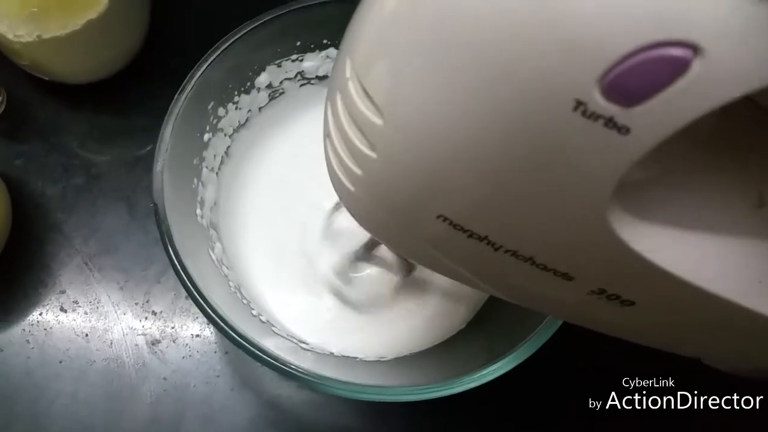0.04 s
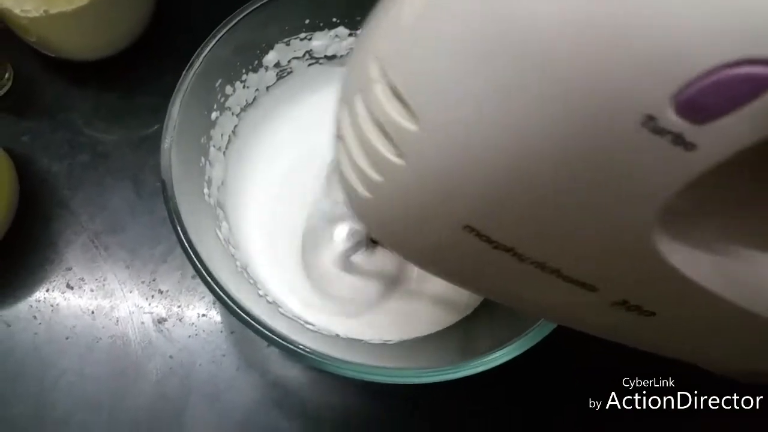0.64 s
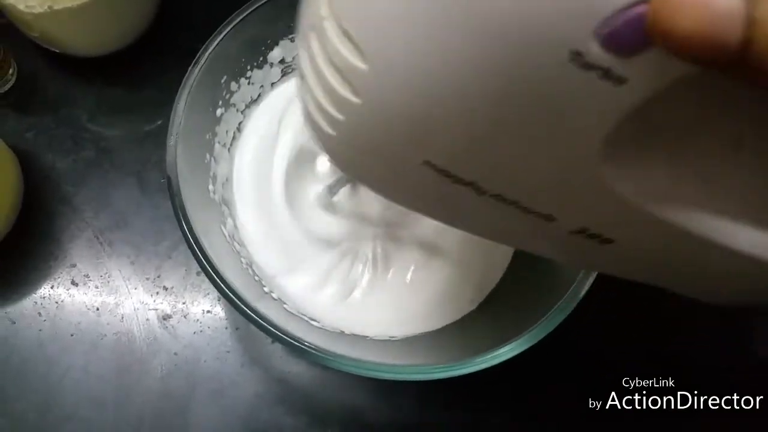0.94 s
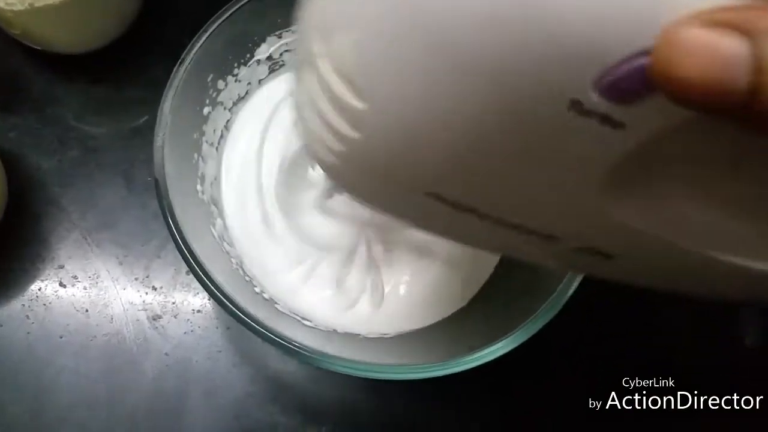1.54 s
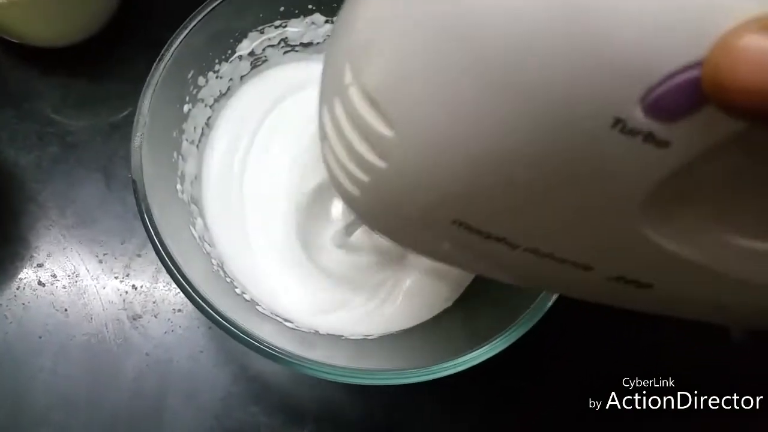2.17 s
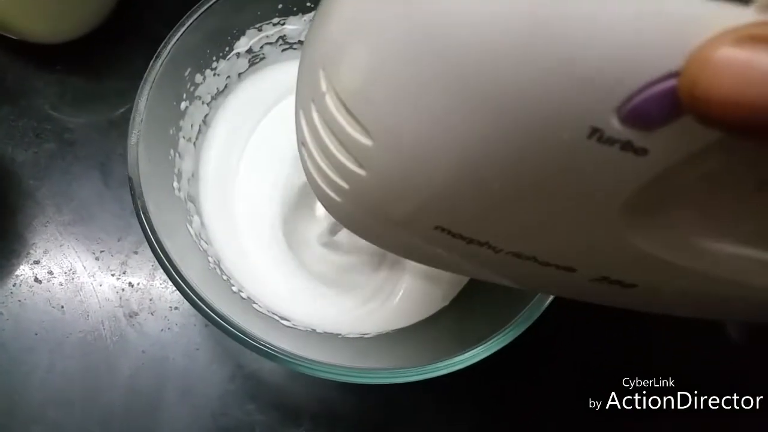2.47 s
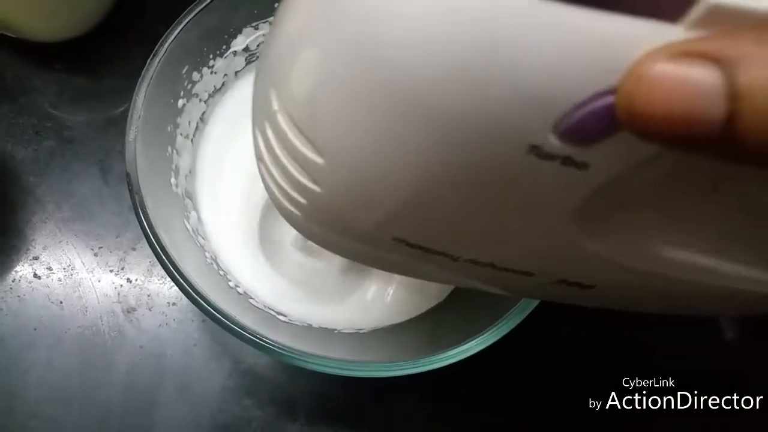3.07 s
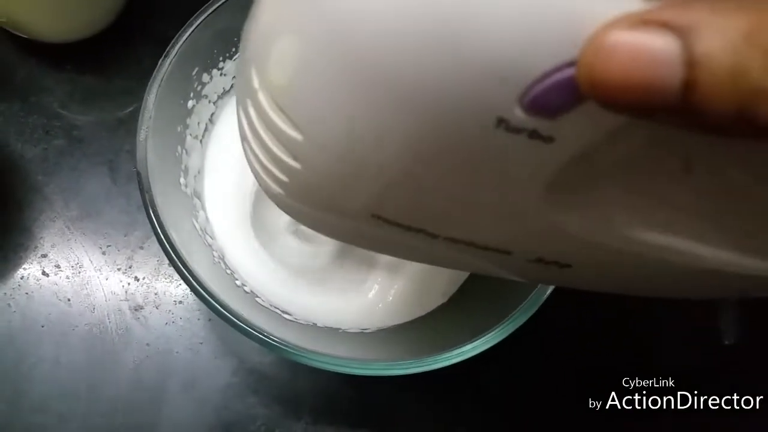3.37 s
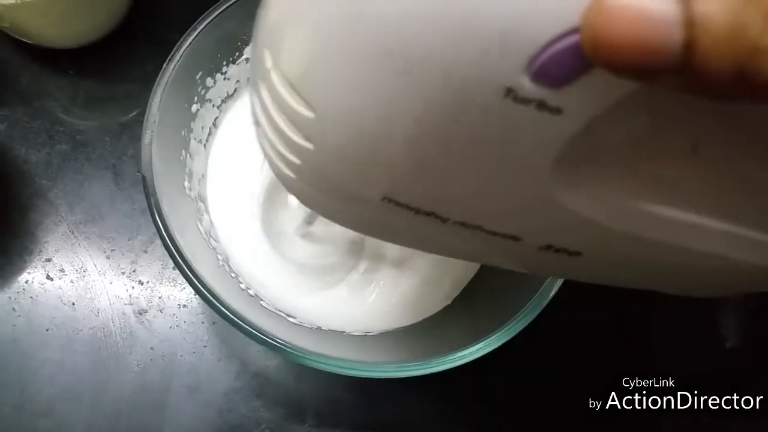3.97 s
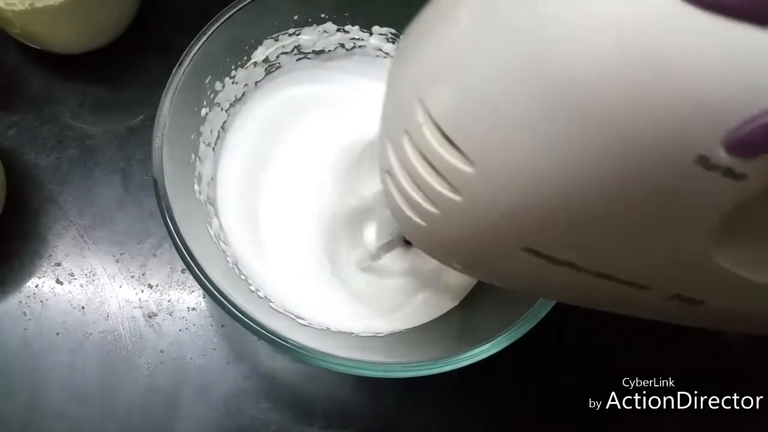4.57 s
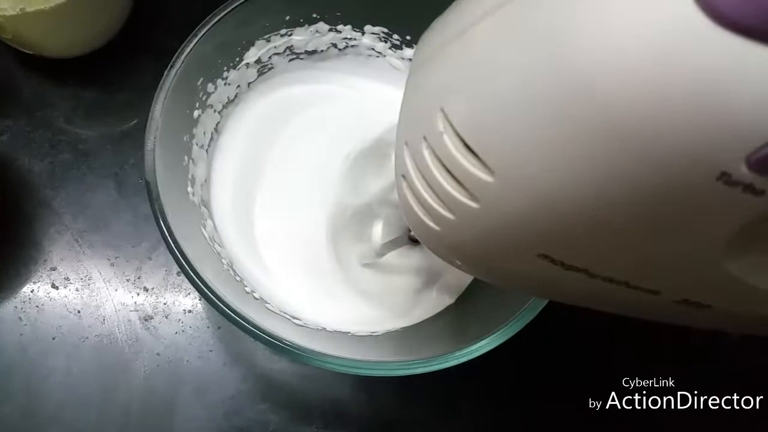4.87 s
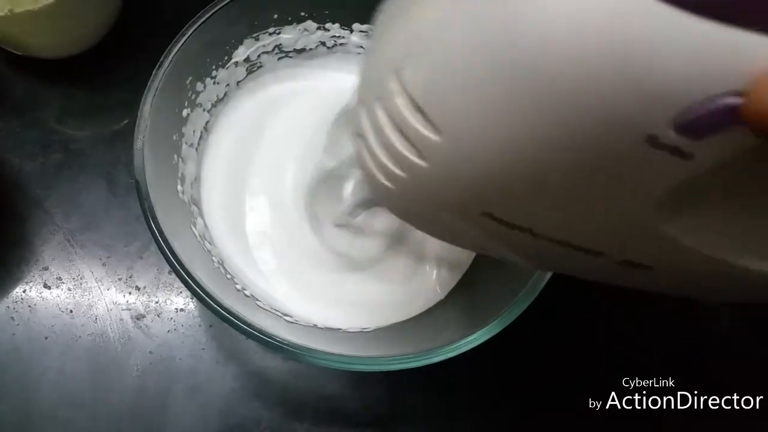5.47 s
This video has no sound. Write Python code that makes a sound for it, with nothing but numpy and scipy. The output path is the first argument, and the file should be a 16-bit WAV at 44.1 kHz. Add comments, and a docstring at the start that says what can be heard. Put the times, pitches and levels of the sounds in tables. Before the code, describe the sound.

An electric hand mixer clicks on and spins up to a steady, rattling whine as its beaters churn cream in a glass bowl.

```python
"""An electric hand mixer starts up over a glass bowl of cream, close by, in a kitchen.
Its motor runs up to about 290 turns a second and whines; the worm gear rattles in the plastic housing
and the brushes crackle. The beaters tick and ring, churn and slap the cream and now and then graze
the bowl. A faint mains hum lies underneath."""
import sys
import numpy as np
from scipy import signal
from scipy.fft import rfft, irfft, next_fast_len
from scipy.io import wavfile
from scipy.ndimage import map_coordinates

SR = 44100
rng = np.random.default_rng(int(sys.argv[2]) if len(sys.argv) > 2 else 0)


def int16_out(signal):
    """Quantize to a 16-bit WAV file."""
    q = np.round(np.clip(np.atleast_2d(signal).T, -1, 1) * 32767)
    wavfile.write(sys.argv[1], SR, q.astype(np.int16))


N = 251811
ON_S, TOP_RPS = 0.1271, 289.42  # motor start, final speed
GEAR_RATIO = 21.525  # motor turns per beater turn
RIPPLE_HZ = 100  # twice the mains frequency


def amp(db):
    """Decibels to gain."""
    return 10 ** (np.asarray(db) / 20)


def unit(x):
    """Scale to rms 1."""
    return x / np.sqrt(np.mean(x ** 2) + 1e-20)


def clock():
    """Sample times in s."""
    return np.arange(N) / SR


def along(points, hz):
    """Interpolate (f, value) points on a log axis."""
    f, v = np.transpose(points)
    return np.interp(np.log(hz + 1), np.log(f + 1), v)


def curves(rows):
    """One value per sample for each column after the time."""
    s, *cols = np.transpose(rows)
    return [np.interp(clock(), s, c) for c in cols]


def wobble(knots_per_s):
    """Smooth random curve."""
    knots = rng.standard_normal(int(N * knots_per_s / SR) + 4)
    return map_coordinates(knots, [np.arange(N) * knots_per_s / SR])


def filtered(x, response):
    """Apply a frequency response."""
    size = next_fast_len(N + SR // 2, True)
    return irfft(rfft(x, size) * response(np.fft.rfftfreq(size, 1 / SR)), size)[..., :N]


def coloured(x, spectrum, size=4096):
    """Minimum-phase filter with this spectrum."""
    gain = amp(along(spectrum, np.fft.rfftfreq(size, 1 / SR)))
    cepstrum = irfft(np.log(gain + 1e-6))
    cepstrum[1:size // 2] *= 2
    cepstrum[size // 2 + 1:] = 0
    impulse = irfft(np.exp(rfft(cepstrum)))
    return signal.fftconvolve(x, impulse[None], axes=1)[:, :N]


def hiss():
    """Two independent white noises."""
    return rng.standard_normal((2, N))


def crossings(cycles):
    """Samples at which a new cycle begins."""
    return np.flatnonzero(np.diff(np.floor(cycles)) > 0)


def ticks(index, spread_db):
    """Two impulse trains at these samples, random in size and sign."""
    shape = (2, len(index))
    out = np.zeros((2, N))
    out[:, index] = rng.choice([-1, 1], shape) * amp(spread_db * rng.uniform(-1.4, 1, shape))
    return unit(out)


def bursts(rows, t60_s):
    """Envelope that jumps at each (t/s, level/dB) and decays."""
    s, db = np.transpose(rows)
    energy = np.bincount(np.round(s * SR).astype(int), amp(db) ** 2, N)
    return np.sqrt(signal.lfilter([1], [1, -amp(-60 / (t60_s * SR)) ** 2], energy + 1e-20))


# Stereo balance: f/Hz, left minus right/dB
BALANCE = [(60, 2), (200, 1), (700, 3), (1000, 2.5), (1300, 6), (1750, 12.5), (2300, 10), (3500, 11),
           (4700, 8.5), (5700, 1.5), (7700, 6), (9000, -0.5), (11000, -2), (14500, 11.5)]


def sides(hz, lead_rad, coherence):
    """Complex gains of the left and right microphone port, normalised to their mid signal."""
    left = amp(along(BALANCE, hz) / 2)
    mid = np.sqrt(left ** 2 + left ** -2 + 2 * coherence * np.cos(lead_rad)) / 2
    return np.array([left, np.exp(-1j * lead_rad) / left]) / mid


# Likeness of the two ports: f/Hz, coherence
COHERENCE = [(60, 0.45), (290, 1), (640, 1), (1400, 0.14), (3000, 0.15), (8000, 0.055), (15000, .15)]
LEFT_LEAD_S = 0.00015


def ports(pair):
    """Mix two independent signals to stereo, the source standing to the left."""
    def blend(hz):
        return np.arccos(np.clip(along(COHERENCE, hz), -1, 1)) / 2
    common, apart = filtered(pair, lambda hz: np.array([np.cos(blend(hz)), np.sin(blend(hz))]))
    stereo = np.array([common + apart, common - apart])
    return filtered(stereo, lambda hz: sides(hz, 2 * np.pi * hz * LEFT_LEAD_S, np.cos(2 * blend(hz))))


def struck(envelope, spectrum):
    """A noisy blow on a body with this spectrum."""
    return ports(unit(coloured(hiss() * envelope, spectrum))) * np.sqrt(np.mean(envelope ** 2))


# Hum partials: f/Hz, level/dB re the first
HUM_PARTIALS = [(100, 0), (200, 3.5), (300, -5.5), (400, -25), (500, -11.5)]
# Hum envelope: t/s, level/dB
HUM_LEVELS = [(0.0, -46), (0.35, -42), (1.05, -46), (1.48, -56.5), (3.4, -55.5), (3.75, -67), (5.71, -57.5)]
# Room air: f/Hz, level/dB
AIR_SPECTRUM = [(25, -20), (80, -14), (180, -10), (300, -3), (550, -13), (900, -15.5), (3000, -24),
                (5000, -37), (12000, -42)]


def background():
    """Mains hum and the still air of the kitchen."""
    hum = sum(amp(db + 2.2 * wobble(11)) * np.sin(2 * np.pi * hz * clock() + rng.uniform(0, 2 * np.pi))
              for hz, db in HUM_PARTIALS)
    air = ports(unit(coloured(hiss(), AIR_SPECTRUM)))
    return amp(curves(HUM_LEVELS)[0] + 2) * hum + amp(-49.0) * air


# Room decay: f/Hz, t60/s
ROOM_T60 = [(200, 0.23), (2000, 0.25), (12000, 0.11)]


def kitchen(x):
    """Short reverberation from counter and walls."""
    hz, t, noise = signal.stft(rng.standard_normal((2, SR // 2)), SR, nperseg=256)
    decay = amp(-60 * t / along(ROOM_T60, hz)[:, None])
    tail = signal.istft(noise * decay, SR, nperseg=256)[1]
    return signal.fftconvolve(x, tail / np.linalg.norm(tail[0]), axes=1)[:, :N]


# Speed switch clicks: t/s, level/dB
SWITCH_CLICKS = [(0.1215, -22.5), (0.125, -26.5), (0.1295, -10.5), (0.132, -10.5), (0.143, -36)]
# Detent crack: f/Hz, level/dB
DETENT_SPECTRUM = [(30, -50), (800, -24), (3000, 2), (8000, -4), (15000, -9)]
# Shell's answer to the switch: f/Hz, level/dB
SNAP_SPECTRUM = [(60, -16), (250, -10), (450, -3), (650, 3), (850, -10), (1400, -6.5), (2400, -13),
                 (3200, -16), (5000, -18), (8000, -20), (14000, -25)]


def switch(crack_db=-7):
    """The slider scrapes, cracks into its notch and rings briefly in the shell."""
    snap_s, snap_db = max(SWITCH_CLICKS, key=lambda row: row[1])
    crack = struck(bursts([(snap_s, snap_db + crack_db)], t60_s=0.012), DETENT_SPECTRUM)
    clicks = amp(-6.5) * bursts(SWITCH_CLICKS, t60_s=0.023)
    ring = amp(-16.5) * bursts(SWITCH_CLICKS, t60_s=0.14)
    return crack + struck(clicks + ring, SNAP_SPECTRUM)


# Starting jolts: t/s, level/dB
FRAME_JOLTS = [(0.153, -31), (0.174, -25), (0.182, -22), (0.195, -21), (0.213, -21), (0.221, -26)]
# Frame response: f/Hz, level/dB
FRAME_SPECTRUM = [(80, -27), (280, -19), (550, 0), (800, -3), (1000, -14), (1300, -3), (2000, -24),
                  (5000, -48)]


def judder():
    """The frame thumps with the first surges of torque."""
    return struck(bursts(FRAME_JOLTS, t60_s=0.033), FRAME_SPECTRUM)


# Beater on bowl: t/s, level/dB, thud offset/dB
BOWL_GRAZES = [(0.8935, -19.5, 3), (1.0151, -15, -11), (1.0363, -9.5, -6), (1.061, -18, -3),
               (1.236, -24, 2), (1.415, -15, -4.5), (1.816, -23, -17), (2.813, -17, -11), (3.877, -25, -12)]
# Scrape on glass: f/Hz, level/dB
GLASS_SPECTRUM = [(2000, -18), (4000, 8), (5300, -10), (6500, 4), (7200, 1), (8000, 8), (9500, -3),
                  (14000, -9)]
# Bowl modes, damped by the cream: f/Hz, level/dB, t60/s
BOWL_MODES = [(4020, -1, 0.066), (6500, -1, .04), (7360, -8, .03), (8000, -3, 0.04)]


def grazes(scrape_db=-10.0, clink_db=-9, thud_db=-4.0):
    """Steel scrapes and clinks on the glass; the full bowl thuds on the counter."""
    scrapes = [(s, db + scrape_db) for s, db, _ in BOWL_GRAZES]
    touches = [(s, db + clink_db) for s, db, _ in BOWL_GRAZES]
    thuds = [(s, db + offset_db + thud_db) for s, db, offset_db in BOWL_GRAZES]
    scrape = struck(bursts(scrapes, t60_s=0.089), GLASS_SPECTRUM)
    clink = sum(amp(db) * bursts(touches, t60_s) * np.sin(2 * np.pi * (hz * clock() + rng.random((2, 1))))
                for hz, db, t60_s in BOWL_MODES)
    counter_hz_db = [(50, -23), (100, -15.5), (250, 2), (600, -3), (1200, -27)]
    return scrape + clink + struck(bursts(thuds, t60_s=0.073), counter_hz_db)


# Slap strength: t/s, level/dB
SLAP_LEVELS = [(0.4, -46), (1.4, -29), (1.9, -40), (2.5, -32), (3.0, -26.5), (3.5, -27.5), (4.1, -39.5),
               (4.8, -29.5), (5.5, -28.5)]
# Hollow in the cream: f/Hz, level/dB
HOLLOW_SPECTRUM = [(80, -66), (250, -18), (600, -11), (800, -5.5), (920, -3), (1100, -9.5), (1600, -29),
                   (4000, -70)]


def slaps(beater_turns, phase_turns=0.35, scatter_db=2):
    """Once a turn a blade slaps into the hollow it has dug, which answers with a short cluck."""
    index = crossings(beater_turns - phase_turns)
    level_db = curves(SLAP_LEVELS)[0][index] + scatter_db * rng.uniform(-0.048, 1, len(index))
    return struck(bursts(np.column_stack([index / SR, level_db]), t60_s=0.095), HOLLOW_SPECTRUM)


# Churning: f/Hz, level/dB
CHURN_SPECTRUM = [(40, -56), (130, -22.5), (210, -12), (265, -1.5), (330, -4.5), (470, -2), (560, 1.5),
                  (660, 1.5), (750, -3), (900, -3.5), (1100, -7), (1350, -2), (2000, -37)]
# Gulps: t/s, half length/s, level/dB
GULP_EVENTS = [(0.5, 0.12, -41), (0.9, 0.016, -30), (1.046, 0.014, -27), (1.13, .02, -38),
               (1.265, 0.054, -35), (2.183, 0.04, -42), (3.247, 0.12, -46), (5.572, .06, -48)]
# Gulp colour: f/Hz, level/dB
GULP_SPECTRUM = [(25, -53), (60, -15), (110, 0), (160, 4.5), (240, 9.5), (330, -4.5), (600, -20)]


def cream(beater_turns, level_db, blade_db=2, turn_db=1, lump_db=0.5, gurgle_db=-57.5):
    """Four blades a turn churn the cream, harder on one side; it gulps as it folds over the beaters."""
    sweep_db = blade_db * np.cos(8 * np.pi * beater_turns) + turn_db * np.cos(2 * np.pi * beater_turns)
    stir = unit(amp(sweep_db + lump_db * wobble(90)))
    churn = unit(coloured(hiss() * stir, CHURN_SPECTRUM))
    swell = sum(amp(db) / (1 + ((clock() - s) / half_s) ** 2) for s, half_s, db in GULP_EVENTS)
    gurgle = amp(gurgle_db + 3 * wobble(11.0))
    gulp = np.hypot(swell, gurgle) * unit(coloured(hiss() * stir, GULP_SPECTRUM))
    return ports(amp(level_db) * churn + gulp)


# Housing resonances: f/Hz, width/Hz, upright level/dB, tilted level/dB
PANEL_MODES = [(1470, 65, -5, -9), (1685, 113, -9, -1.5), (1967, 124, -2, 5.5), (2220, 76, 0, -14),
               (2482, 77, 1.5, -5), (2566, 82, -11.5, 9), (2830, 54, -19, 0), (3165, 120, -12, -2),
               (3770, 97, -28, 3.5), (4970, 110, 1, -18)]


def panels(hz, tilted=False):
    """Complex gain of the shell's panel resonances."""
    return 1 + sum(amp(tilted_db if tilted else upright_db)
                   * 1j * hz * width_hz / (mode_hz ** 2 - hz ** 2 + 1j * hz * width_hz)
                   for mode_hz, width_hz, upright_db, tilted_db in PANEL_MODES)


# Mixer attitude: t/s, tilt (0 upright, 1 tilted)
HAND_TILT = [(0.0, 0.05), (3.0, 0.11), (3.6, 0.24), (4.2, 0.35), (4.6, 0.86), (5.2, 1), (5.71, 0.95)]


def tilt_mix(upright, tilted):
    """Crossfade as the hand tilts the mixer."""
    tilt = np.clip(curves(HAND_TILT)[0], 0, 1)
    return (1 - tilt) * upright + tilt * tilted


# Housing passband: f/Hz, level/dB
SHELL_SPECTRUM = [(100, -48), (500, -23.5), (1000, -22.5), (1300, -17), (1600, -4.5), (2100, -4.5),
                  (2500, -5), (2800, -8), (3050, -9.5), (3800, -11), (4100, -12.5), (4800, -19.5),
                  (5500, -24), (8000, -32)]


def housing(force):
    """The plastic shell passes a broad band and rings; tilting turns other panels to the microphone."""
    band = coloured(force, SHELL_SPECTRUM)
    upright = filtered(band, panels)
    tilted = filtered(band, lambda hz: panels(hz, tilted=True))
    return ports(unit(tilt_mix(upright, tilted)))


# Beater wire modes: f/Hz, t60/s, upright level/dB, tilted level/dB
WIRE_MODES = [(1430, 0.058, -7.5, -22), (1717, 0.12, -1.5, -2), (1934, 0.083, -11, -5.5),
              (2021, 0.069, -6, -2), (2200, 0.063, -6, -23), (2535, 0.056, -2, -13), (2578, 0.09, -2, 3),
              (3110, 0.055, -19, -14), (3860, 0.047, -20, -8)]
# Wire chatter: t/s, level/dB
WIRE_LEVELS = [(0.3, -37.5), (0.6, -26), (1.35, -26.5), (1.6, -28), (3.15, -32), (3.6, -25), (4.4, -27),
               (5.0, -28.5), (5.71, -25)]


def wires(turns, ring_db=2, tick_db=-6, flex=0.0083, miss_share=0.35):
    """The beaters tick on most motor turns; their wires ring and flex in the cream, bending the pitch."""
    index = crossings(turns + 0.2 * wobble(200))
    hits = ticks(index, spread_db=3) * (rng.random(N) > miss_share)
    force = unit(coloured(hits, SHELL_SPECTRUM))
    ring = 0
    for k, (hz, t60_s, upright_db, tilted_db) in enumerate(WIRE_MODES):
        carrier = np.exp(2j * np.pi * np.cumsum(hz * (1 + flex * wobble(22))) / SR)
        mode = carrier * signal.lfilter([1], [1, -amp(-60 / (t60_s * SR))], force[0] / carrier)
        lead_rad = 2 * np.pi * hz * LEFT_LEAD_S + (-1) ** k * 0.5
        stereo = unit(np.real(sides(hz, lead_rad, coherence=0)[:, None] * mode))
        ring = ring + stereo * tilt_mix(amp(upright_db), amp(tilted_db))
    return amp(curves(WIRE_LEVELS)[0]) * (amp(ring_db) * unit(ring) + amp(tick_db) * ports(force))


# Brush noise: f/Hz, level/dB
BRUSH_SPECTRUM = [(2650, -26.5), (4500, 4.5), (4870, 4), (5410, -7), (5760, -9.5), (6230, -3.5), (6700, -1),
                  (7250, -2), (7840, 2), (9470, -14.5), (10100, -7), (10900, -6.5), (12100, -3),
                  (15100, -15), (15800, -37)]


def brushes(level_db, sparks_per_s=1300, mains_depth=0.17):
    """Commutator sparks, strongest at the mains current peaks, over the rush of cooling air."""
    sparks = ticks(np.flatnonzero(rng.random(N) < sparks_per_s / SR), spread_db=6.0)
    current = 1 + mains_depth * np.cos(2 * np.pi * RIPPLE_HZ * clock())
    return amp(level_db) * ports(unit(coloured(sparks * current + hiss(), BRUSH_SPECTRUM)))


# Shaft rattles: t/s, hold/s, level/dB
SHAFT_KNOCKS = [(0.175, 0.014, -29), (0.193, 0.026, -18.5), (0.778, .004, -21), (0.84, 0.0046, -20),
                (0.864, .01, -18), (.902, .012, -17), (1.09, .012, -16.5), (1.163, .005, -18),
                (1.18, 0.0063, -22), (1.233, 0.007, -12.5), (1.307, 0.047, -15.5), (1.373, .018, -12),
                (1.438, 0.029, -13), (1.7943, 0.0058, -11), (1.864, 0.0065, -14), (1.98, .004, -10),
                (1.999, .008, -13.5), (2.164, 0.027, -14.5), (2.201, 0.011, -14.5), (2.396, .009, -11.5),
                (2.47, .005, -20), (2.517, .006, -12.5), (2.591, 0.0052, -13.5), (2.606, 0.0045, -13.5),
                (2.745, .005, -11.5), (2.811, 0.0071, -18), (3.223, 0.0063, -11), (3.243, 0.037, -15),
                (3.333, 0.0066, -13.5), (3.343, .005, -12), (3.433, 0.019, -16), (3.459, 0.027, -13),
                (3.581, 0.0055, -13.5), (3.602, 0.026, -14), (3.679, 0.021, -14.5), (3.718, 0.02, -15.5),
                (3.762, 0.014, -17.5), (3.831, .008, -18), (3.852, 0.073, -16), (3.96, .02, -20),
                (4.115, 0.0063, -15), (4.395, 0.059, -20), (5.292, 0.036, -20), (5.353, 0.018, -18),
                (5.408, .016, -15), (5.466, 0.0064, -20)]


def knocks(ring_db=-5.0, spark_db=-19):
    """The beater shafts rattle in their sockets and ring the housing; each jolt makes the brushes spit."""
    def hold_and_decay(t60_s):
        energy, t = np.zeros(N + SR), np.arange(SR // 4) / SR
        for s, hold_s, db in SHAFT_KNOCKS:
            energy[round(s * SR):][:len(t)] += amp(db - 60 * np.maximum(t - hold_s, 0) / t60_s) ** 2
        return np.sqrt(energy[:N])
    rattle = hold_and_decay(t60_s=0.028)
    ring = housing(hiss() * rattle) * np.sqrt(np.mean(rattle ** 2))
    spit = struck(hold_and_decay(t60_s=0.11), BRUSH_SPECTRUM)
    return amp(ring_db) * ring + amp(spark_db) * spit


def gears(turns, beater_turns, level_db, tooth_db=-4, chatter_db=-1, chatter_per_s=1500, rub_depth=0.063):
    """The worm rubs and hits the gear teeth twice a turn; loose parts chatter in between."""
    hits = crossings(2 * turns + 0.05 * wobble(400))
    chatter = np.flatnonzero(rng.random(N) < chatter_per_s / SR)
    force = hiss() + amp(tooth_db) * ticks(hits, spread_db=3.0)
    force += amp(chatter_db) * ticks(chatter, spread_db=1.5)
    force *= 1 + rub_depth * np.cos(2 * np.pi * turns)
    load_db = wobble(110) + 0.5 * np.cos(4 * np.pi * beater_turns)
    return amp(level_db - 1.36) * housing(force * amp(load_db))


# One brief stall and its slow recovery: t/s, half length/s, speed loss/rps
STALL_SHAPE = [(.221, .02, 10), (.315, .04, 5)]


def run_up(kick_share=0.389, kick_s=0.1513, creep_s=0.68):
    """Motor speed in rps: it kicks, stalls briefly as the frame shakes, then slowly catches up."""
    t = np.maximum(clock() - ON_S, 0)
    free_rps = TOP_RPS * (1 - kick_share * np.exp(-t / kick_s) - (1 - kick_share) * np.exp(-t / creep_s))
    lost_rps = sum(loss * np.exp(-((clock() - s) / half_s) ** 2) for s, half_s, loss in STALL_SHAPE)
    return np.maximum(free_rps - lost_rps, 0)


def tone(order, turns, rps, level_db, waver_db=0.8, strain=0.83, min_rasp=0.024, rasp_hz=450,
         effort_db=8.5):
    """A shaft harmonic, louder and raspier while the motor strains to get up to speed."""
    effort = 1 - rps / TOP_RPS
    noise_share = np.clip(min_rasp + strain * effort ** 2, 0, 0.5)
    envelope = np.sqrt(2) * amp(level_db + effort_db * effort) * unit(amp(waver_db * wobble(29.95)))
    grain = np.sqrt(1 - noise_share) + np.sqrt(noise_share) * wobble(rasp_hz)
    lead_rad = np.arccos(np.clip(along(COHERENCE, order * rps), 0, 1))  # reflections turn the phase
    carrier = np.exp(2j * np.pi * (order * turns + rng.random()))
    return envelope * grain * np.real(sides(order * rps, lead_rad, coherence=0.63) * carrier)


# Motor tones as the hand turns the mixer: t/s, shaft level/dB, fan level/dB, slot level/dB
TONE_LEVELS = [(0.33, -33, -59, -44), (0.47, -49, -42, -39), (0.55, -35.5, -38, -34.5),
               (0.7, -38.5, -41, -38.5), (0.95, -37, -61, -37), (1.1, -38.5, -41, -38.5),
               (1.3, -37.5, -45, -33), (1.45, -44, -41, -35), (1.72, -41, -41, -30),
               (2.05, -43.5, -30.5, -34.5), (2.3, -40.5, -39, -33), (2.65, -39.5, -59, -30.5),
               (3.35, -37, -51, -31), (3.8, -41.5, -43, -36.5), (4.5, -42.5, -37, -40),
               (5.71, -43.5, -52, -44)]
# Slot harmonics 1-3 through the shell: offset/dB
SLOT_OFFSETS_DB = [2, -1.5, -6]
# Brush whistle: t/s, level/dB for each of slot harmonics 2-4
WHISTLE_LEVELS = [(0.3, -60, -63, -64), (0.45, -58, -54, -55), (0.57, -57, -54, -47), (0.95, -50, -50, -47),
                  (1.15, -43, -33.5, -39), (1.7, -48, -41, -40), (2.1, -37, -38.5, -38),
                  (2.7, -38.5, -30.5, -40), (3.3, -36, -40, -44), (3.9, -37.5, -38, -44),
                  (4.6, -43, -37, -48), (5.71, -42, -35, -43)]
FAN_BLADES, ROTOR_SLOTS = 9, 12
CRITICAL_RPS, CRITICAL_WIDTH_RPS, SHAKE_DB = 56, 12.5, 12.5  # frame shake during run-up
FLARE_HZ, FLARE_WIDTH_HZ, FLARE_DB = 2880, 160, 10.5  # frame resonance swept by slot overtones


def whine(turns, rps, jitter_turns=0.0048, low_hz=165, high_hz=3350, inrush_depth=0.54):
    """Imbalance, fan and slot tones sweep the shell's resonances; the starting current makes them buzz."""
    def shell(hz):
        low_cut = 1 - 1 / (1 + (hz / low_hz) ** 10)
        return panels(hz) * low_cut / np.sqrt(1 + (hz / high_hz) ** 16)
    turns = turns + jitter_turns * wobble(30)
    shaft_db, fan_db, slot_db = curves(TONE_LEVELS)
    shake_db = SHAKE_DB / (1 + np.abs((rps - CRITICAL_RPS) / CRITICAL_WIDTH_RPS) ** 6)
    body = tone(1, turns, rps, shaft_db, waver_db=1.0, min_rasp=0.048, rasp_hz=70)
    body += tone(FAN_BLADES, turns, rps, fan_db + shake_db)
    for k, offset_db in enumerate(SLOT_OFFSETS_DB, 1):
        order = k * ROTOR_SLOTS
        flare_db = (k > 1) * FLARE_DB / (1 + ((order * rps - FLARE_HZ) / FLARE_WIDTH_HZ) ** 2)
        level_db = slot_db + offset_db + shake_db / k ** 2 + flare_db
        body += tone(order, turns, rps, level_db, strain=0.6 * k)
    whistle = 0
    for k, db in enumerate(curves(WHISTLE_LEVELS), 2):
        order = k * ROTOR_SLOTS
        level_db = db + along(BRUSH_SPECTRUM, order * rps)
        whistle += tone(order, turns, rps, level_db, waver_db=2.2, min_rasp=0.064, rasp_hz=260)
    torque = 1 - inrush_depth * (1 - rps / TOP_RPS) * np.cos(2 * np.pi * RIPPLE_HZ * (clock() - ON_S))
    return torque * (filtered(body, shell) + whistle)


# Workload: t/s, cream level/dB, gear level/dB, brush level/dB
LOAD_LEVELS = [(0.15, -31, -31, -54), (0.3, -32, -33.5, -49), (0.52, -31, -23.5, -37.5),
               (0.77, -30.5, -18, -30), (1.03, -28, -22.5, -34), (1.35, -30, -21, -33),
               (1.55, -31.5, -22.5, -32.5), (2.2, -30, -21, -31.5), (3.15, -30.5, -21, -31.5),
               (3.5, -32.5, -21, -30), (3.8, -35, -21.5, -32.5), (4.05, -35.5, -19.5, -30.5),
               (4.35, -34, -20, -30.5), (4.9, -35, -20.5, -29.5), (5.38, -32, -19.5, -28),
               (5.71, -33, -20.5, -28.5)]


def scene():
    """Motor speed drives the whine, the gears and, geared down, the beaters."""
    rps = run_up()
    turns = np.cumsum(rps) / SR
    beater_turns = turns / GEAR_RATIO
    cream_db, gear_db, brush_db = curves(LOAD_LEVELS)
    fade_in = np.clip((clock() - 0.135) / 0.035, 0, 1)
    vigour = (rps / TOP_RPS) ** 0.36  # slow gears and beaters are quiet
    motor = whine(turns, rps) + brushes(brush_db)
    drive = vigour * (gears(turns, beater_turns, gear_db) + wires(turns) + cream(beater_turns, cream_db))
    mixer = fade_in * (motor + drive) + slaps(beater_turns) + knocks() + grazes() + switch() + judder()
    return mixer + amp(-12.5) * kitchen(mixer) + background()


def record(dry):
    """Soft peak limiting, then a steep low-pass."""
    ceiling, cutoff_hz = 0.95, 15500
    rounded = dry / (1 + (dry / ceiling) ** 6) ** (1 / 6)
    return filtered(rounded, lambda hz: 1 / (1 + (hz / cutoff_hz) ** 200))


dry = scene()
out = record(dry)
int16_out(out)
```